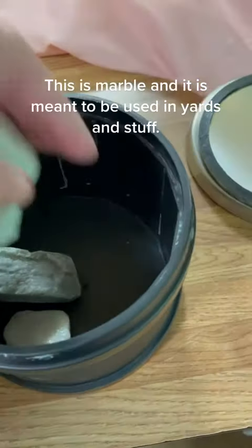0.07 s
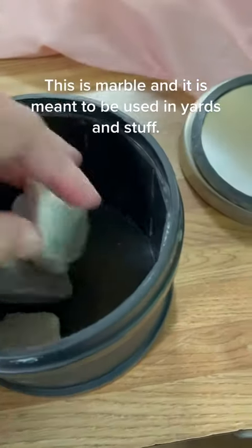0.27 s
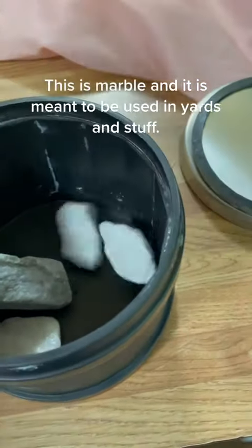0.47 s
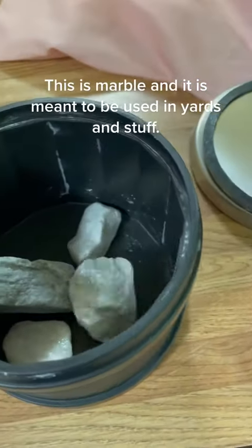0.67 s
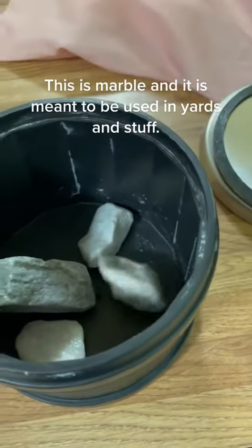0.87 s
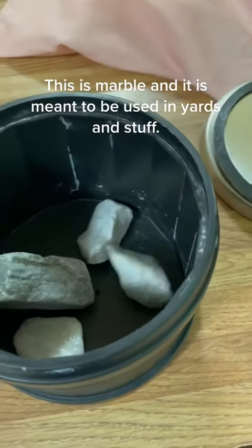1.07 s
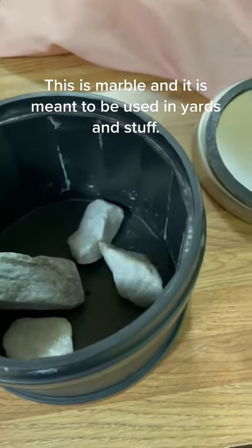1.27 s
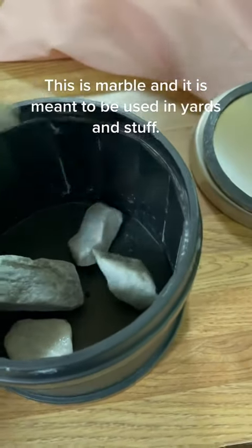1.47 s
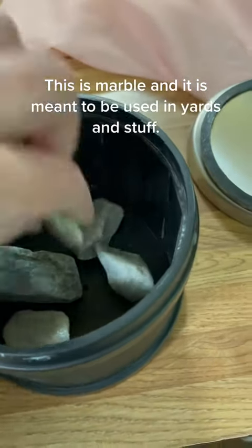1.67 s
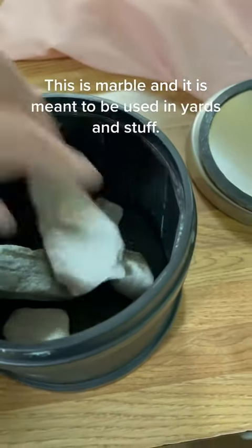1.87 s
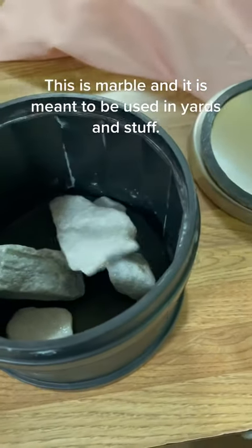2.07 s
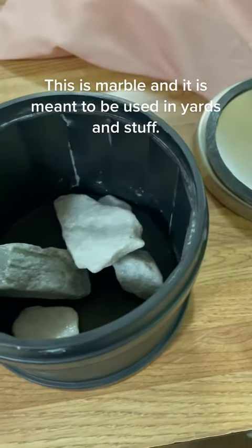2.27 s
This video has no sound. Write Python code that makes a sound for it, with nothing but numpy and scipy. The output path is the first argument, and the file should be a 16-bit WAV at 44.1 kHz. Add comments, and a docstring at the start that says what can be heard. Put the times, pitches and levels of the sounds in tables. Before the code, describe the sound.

Stones drop into a rubber barrel on a table. A sharp clack at 0.1 s leads to a bouncing cluster of clacks and hollow thuds at 0.3-0.45 s, with lighter knocks at 0.55, 0.6 and 0.75 s. Faint hand rustling follows around 1 s, a small tick at 1.4 s, a knock at 1.7 s, then loud bright clacks at 1.83 and 1.96 s, settling over quiet hum.

```python
"""In a quiet room with an appliance hum, stones are dropped into a rubber barrel on a wooden table.
Stone on stone clacks: a firm contact and a burst of grit excite resonators.
Stone on rubber thuds: a soft push excites the barrel's air and wall, and the table thumps.
Small stone clicks, a hand rustling among stones nearby and scuffing rubber are shaped noise.
Sparse echoes form the barrel and room; patchy noise and narrow noise bands form the air and hum."""
import sys
import numpy as np
from scipy import signal
from scipy.fft import rfft, irfft
from scipy.io import wavfile
from scipy.ndimage import uniform_filter1d

SR = 44100
rng = np.random.default_rng(int(sys.argv[2]) if len(sys.argv) > 2 else 0)


def wav_record(signal):
    """Record a signal, one row per channel, as 16-bit PCM in the file named by sys.argv[1]."""
    frames = np.transpose(np.atleast_2d(signal))
    bounded = np.clip(frames, -1, 1)
    # unit amplitude maps onto the largest positive 16-bit level
    quanta = np.round(bounded * 32767).astype(np.int16)
    wavfile.write(sys.argv[1], SR, quanta)


N = 101429

# Stone on stone: start_s, peak_db, low_ring_hz, low_ring_db, high_ring_hz, bright_modes_db, top_modes_db
STONE_CLACKS = [(0.118, -6.5, 2740, 9, 6470, -4, -22.5), (0.2174, -23, 2420, 2.5, 4760, -15, -49),
                (0.29, -13.5, 3030, 12.5, 6200, -5, -9), (0.293, -11, 3070, 14, 6220, -4, -10),
                (0.3255, -18.5, 1546, 24.5, 5370, -12, -25), (0.3374, -11, 2740, -5, 5410, -5, -25),
                (0.4104, -28.5, 1860, 18.5, 3900, -12, -41), (0.4535, -20, 1790, 5, 5470, -8.5, -46),
                (0.6207, -15.5, 2970, 13.5, 5040, -9.5, -22), (0.7469, -32, 1870, 1, 5430, -13, -9.5),
                (1.4174, -35.5, 1790, 14, 5260, -17, -43), (1.712, -17, 3050, 12.5, 4900, -22, -28),
                (1.8268, -3.5, 1690, 12.5, 7090, -7, -11.5), (1.8397, -19, 2040, 20, 7000, -26, -30),
                (1.86, -26, 1670, 23, 5340, -24, -20), (1.956, -5, 2100, -6, 4630, -0.5, -22),
                (1.957, -7.5, 2820, 6, 7100, 1, -14), (2.0209, -14, 2860, 4, 4800, -7, -46),
                (2.047, -28, 2200, 18, 5130, -36, -54), (2.071, -28.5, 2650, 8, 5160, -32, -49)]
# Stone on rubber: start_s, body_peak_db, air_pitch_hz, table_thump_db
RUBBER_THUDS = [(0.121, -23.5, 450, -25.5), (0.291, -27, 750, -21), (0.323, -17, 960, -23.5),
                (0.326, -7, 759, -22), (0.333, -17.5, 560, -33), (0.344, -21, 620, -18),
                (0.366, -23.5, 600, -32), (0.379, -24.5, 745, -25), (0.411, -14, 785, -64),
                (0.427, -20.5, 744, -30.5), (0.535, -19, 397, -27), (0.548, -26.5, 635, -23),
                (0.616, -24, 722, -48), (0.746, -36, 730, -51), (1.416, -28.5, 730, -30),
                (1.713, -20.5, 478, -26), (1.827, -21, 720, -20.5), (1.842, -14, 656, -56),
                (1.859, -33, 825, -29), (1.957, -11.5, 781, -33), (2.023, -26, 790, -48),
                (2.272, -30.5, 730, -51)]
# Modes of a stone, before each blow's shift and group level: nominal_hz, width_hz, relative_db
STONE_MODES = [(1200, 810, -8.5), (1714, 95, 6), (2244, 1000, 1), (2974, 1020, -1), (3877, 370, 5),
               (4570, 365, 7.5), (5250, 820, 12.5), (6060, 650, 9.5), (6930, 130, -3), (9360, 3000, 3.5),
               (11700, 4500, -27)]
# Modes of the barrel wall, before chance variation: nominal_hz, nominal_db, t60_s
BARREL_MODES = [(455, -22.5, 0.045), (1168, -13.5, 0.014), (1728, -17, 0.1)]
# Reverberation of the room: frequency_hz, t60_s
ROOM_DECAY = [(100, 0.26), (700, 0.48), (2000, 0.25), (5000, 0.23), (8000, 0.054)]
# Small clicks of the stones, then strokes of a hand rustling among them: start_s, length_s, level_db
CLICKS_AND_RUSTLES = [(.206, .008, -45), (.28, 0.013, -34.5), (.433, 0.0056, -43), (.855, 0.032, -55),
                      (.88, 0.018, -52.5), (.937, 0.057, -48.5), (.987, 0.024, -47), (1.0, 0.19, -44.5),
                      (1.051, 0.012, -38.5), (1.358, 0.027, -46.5), (2.24, 0.04, -50), (2.28, 0.12, -48.5)]
# Relative spectrum of the clicks and rustles: frequency_hz, density_db (per Hz)
RUSTLE_SPECTRUM = [(500, 3), (1500, -8.5), (3000, -11), (5200, -3.5), (6500, -3.5), (7800, -18.5),
                   (10500, -9), (13000, -24.5), (16000, -23)]
# Rubber scuffing that stirs the air in the barrel: start_s, length_s, level_db
SCUFF_STROKES = [(.33, 0.19, -51), (1.56, 0.3, -56), (1.76, 0.075, -49.5), (1.98, 0.16, -55.5)]
# Barrel resonances under scuffing: frequency_hz, width_hz, relative_db
SCUFF_RESONANCES = [(700, 400, 0), (1730, 70, -10)]
# Appliance hum as narrow noise bands: frequency_hz, width_hz, level_db
HUM_BANDS = [(118.05, 13.4, -47), (172.9, 21, -51), (355.7, 14.3, -55.5)]
# Likeness of left and right in the room air: frequency_hz, likeness (1 = identical)
CHANNEL_LIKENESS = [(60, 1), (300, 1), (1000, 0.44), (4000, 0.31), (12000, 0.22)]
# Relative spectrum of the room air: frequency_hz, density_db (per Hz)
AIR_SPECTRUM = [(30, -34), (55, 5), (120, -4), (250, -3), (450, -14), (750, -17.5), (1050, -30),
                (5500, -33.5), (7500, -48), (9500, -36), (13000, -46.5), (16500, -50)]

# Stone contact: time of the grit's peak, its level, and each mode's chance shift as a share
GRIND_S, GRIT_DB, STONE_SPREAD = 0.00125, -14.0, 0.015
BRIGHT_HZ, TOP_HZ = 4300, 8000  # lower edges of the bright and top mode groups
TONE_DB, TONE_WIDTH_HZ = 14, 222  # high ring over the bright modes; first-stage width of both rings
# Rubber contact: times to the peaks of push and air ring; starting level and decay of the knock
PUSH_S, AIR_SWELL_S, KNOCK_DB, KNOCK_T60_S = 0.00016, 0.0012, 1.5, 0.042
# Table thump: nominal pitch excess at the start, nominal end pitch, pitch time constant, decay
THUMP_EXCESS_HZ, THUMP_END_HZ, THUMP_FALL_S, THUMP_T60_S = 386.7, 74.7, 0.00744, 0.14
GRAINS_PER_S, GRAIN_SPREAD_DB = 400, 4.5
ROOM_DB, NEAR_DB, NEAR_T60_S, SIDE_DB = -16.5, -14.5, 0.028, -13
AIR_DB = -43
EDGE_HZ = 16500


def clack(s, peak_db, low_hz, low_db, high_hz, bright_db, top_db):
    """Impact excitation: a firm contact amid grit rings the stone modes and two rings of the pair."""
    t = np.arange(2048) / SR
    grit_swell = t / GRIND_S * np.exp(1 - t / GRIND_S)
    blow = gain_of(GRIT_DB) * rng.standard_normal(len(t)) * grit_swell
    blow[round(GRIND_S * SR / 2)] += 4  # the firm contact
    pair_rings = [(low_hz, low_db), (high_hz, TONE_DB + bright_db)]
    out = sum(gain_of(db) * resonate_twice(blow, hz, TONE_WIDTH_HZ) for hz, db in pair_rings)
    for k, (hz, width_hz, db) in enumerate(STONE_MODES):
        group_db = 0 if hz < BRIGHT_HZ else bright_db if hz < TOP_HZ else top_db
        # Each blow meets another stone, so its modes shift.
        shifted_hz = hz * (1 + STONE_SPREAD * rng.standard_normal())
        sign = (-1) ** k
        out = out + sign * gain_of(db + group_db) * resonate_twice(blow, shifted_hz, width_hz)
    return s, gain_of(peak_db) * out / abs(out).max()


def thud(s, peak_db, air_hz, table_db):
    """Compliant impact: a soft push rings barrel air and wall; the table thumps with sinking pitch."""
    t = np.arange(9000) / SR
    push = t[:300] / PUSH_S * np.exp(-t[:300] / PUSH_S)
    knock = gain_of(KNOCK_DB - 60 * t / KNOCK_T60_S) * rng.standard_normal(len(t))
    air_swell = t / AIR_SWELL_S * np.exp(1 - t / AIR_SWELL_S)
    air = air_swell * np.sin(2 * np.pi * air_hz * t)
    body = np.convolve(air + ring(BARREL_MODES, t) + knock, push)[:len(t)]
    body = resonate(body, 624, 1210)
    thump_hz = THUMP_END_HZ + THUMP_EXCESS_HZ * np.exp(-t / THUMP_FALL_S)
    thump_hz = thump_hz * rng.uniform(0.854, 1.212)
    onset = np.minimum(t / 0.012, 1)
    thump = np.sin(2 * np.pi * np.cumsum(thump_hz) / SR) * gain_of(-60 * t / THUMP_T60_S) * onset
    return s, gain_of(peak_db) * body / abs(body).max() + gain_of(table_db) * thump


def ring(modes, t):
    """Modal superposition: decaying sines, each with chance strength and a slight chance detuning."""
    luck = rng.standard_normal((len(modes), 2))
    out = 0
    for (hz, db, t60), (strength, detune) in zip(modes, luck):
        decay = gain_of(db + 2 * strength - 60 * t / t60)
        out = out + decay * np.sin(2 * np.pi * hz * (1 + detune / 50) * t)
    return out


def clicks_and_rustle():
    """Granular noise: dense tiny grains of uneven size over a soft hiss, gated into clicks and strokes."""
    size = gain_of(GRAIN_SPREAD_DB * np.minimum(rng.exponential(1, N), 5))
    strikes = size * (rng.random(N) < GRAINS_PER_S / SR)
    grains = evened(signal.lfilter([1], [1, -.99], strikes)) + 1  # the 1 is the hiss
    hz = np.fft.rfftfreq(N, 1 / SR)
    spectrum = rfft(grains * rng.standard_normal(N)) * gain_of(read(RUSTLE_SPECTRUM, hz))
    return level(CLICKS_AND_RUSTLES) * evened(irfft(spectrum, N))


def scuff():
    """Friction-driven resonance: lumpy noise excites the barrel resonances."""
    lumps = gain_of(2.5 * evened(uniform_filter1d(rng.standard_normal(N), 500)))
    friction = lumps * rng.standard_normal(N)
    rings = sum(gain_of(db) * evened(resonate(friction, hz, width_hz))
                for hz, width_hz, db in SCUFF_RESONANCES)
    return level(SCUFF_STROKES) * evened(rings)


def room(x):
    """Reverberation by sparse taps: quick barrel echoes, and a room tail dying band by band."""
    length = SR // 2
    taps = np.zeros((2, length))
    slots = np.arange(60, length - 20, 20)
    places = slots + rng.integers(0, 20, (2, len(slots)))
    np.put_along_axis(taps, places, rng.choice([-1., 1.], (2, len(slots))), 1)
    near = taps * gain_of(-60 * np.arange(length) / SR / NEAR_T60_S)
    hz, t, z = signal.stft(taps, SR, nperseg=256)
    decay = gain_of(-60 * t / read(ROOM_DECAY, hz)[:, None])
    far = signal.istft(z * decay, SR, nperseg=256)[1][:, :length]
    tail = gain_of(ROOM_DB) * far / np.linalg.norm(far[0])
    tail = tail + gain_of(NEAR_DB) * near / np.linalg.norm(near[0])
    # The second tap set enters with opposite signs left and right.
    tail = tail[0] + gain_of(SIDE_DB) * tail[1] * [[1], [-1]]
    return signal.fftconvolve(x[None], tail, axes=1)[:, :N]


def floor():
    """Partially coherent noise: patchy room air in two channels, with a wavering narrow-band hum."""
    frames, hz = N // 512 + 5, np.fft.rfftfreq(2048, 1 / SR)
    a, b, c, d, patches = rng.standard_normal((frames, 1025, 5)).T
    patches = evened(uniform_filter1d(uniform_filter1d(patches, 20, 0), 6, 1))
    same = np.clip(read(CHANNEL_LIKENESS, hz), -1, 1)[:, None]
    left = a + 1j * b
    right = same * left + np.sqrt(1 - same ** 2) * (c + 1j * d)
    z = np.array([left, right]) * gain_of(read(AIR_SPECTRUM, hz)[:, None] + 3.3 * patches)
    air = signal.istft(z, nperseg=2048, noverlap=1536)[1][:, :N]
    air = gain_of(AIR_DB) * evened(air)
    noise = rng.standard_normal(N)
    hum = sum(gain_of(db) * evened(resonate(resonate(noise, f, width_hz), f, width_hz))
              for f, width_hz, db in HUM_BANDS)
    return air + hum


def gain_of(db):
    """Logarithmic level: converts dB to an amplitude ratio."""
    return 10 ** (np.asarray(db) / 20)


def evened(x):
    """Power normalization: scales to rms 1."""
    return x / np.sqrt(np.mean(x ** 2) + 1e-20)


def read(points, hz):
    """Interpolation on a logarithmic frequency axis."""
    f, value = np.transpose(points)
    return np.interp(np.log(hz + 1), np.log(f + 1), value)


def level(events):
    """Amplitude envelope: the gain of each event swells quickly and fades."""
    out = np.zeros(N)
    for s, length, db in events:
        u = np.arange(0, 1, 1 / (length * SR))
        add(out, s, gain_of(db) * np.sin(np.pi * u ** 0.36))
    return out


def add(mix, s, sound):
    """Linear superposition: mixes a sound in at time s, in seconds."""
    part = mix[round(s * SR):][:len(sound)]
    part += sound[:len(part)]


def resonate(x, hz, width_hz):
    """Damped resonance: a two-pole band of peak gain 1."""
    return signal.lfilter(*signal.iirpeak(hz, hz / width_hz, SR), x)


def resonate_twice(x, hz, width_hz):
    """Cascaded resonance: a second stage, three times as wide, steepens the skirts."""
    return resonate(resonate(x, hz, width_hz), hz, 3 * width_hz)


def scene():
    """Superposition of impacts, clicks and friction, their reverberation, and the background."""
    near = clicks_and_rustle() + scuff()
    for row in STONE_CLACKS:
        add(near, *clack(*row))
    for row in RUBBER_THUDS:
        add(near, *thud(*row))
    return near + room(near) + floor()


def record(dry):
    """Band limitation: the microphone drops the deepest bass, the recorder the highest treble."""
    thin = signal.sosfilt(signal.butter(3, 45, "high", fs=SR, output="sos"), dry)
    lowpass = signal.firwin(511, EDGE_HZ, window=("kaiser", 9), fs=SR)
    return signal.oaconvolve(thin, lowpass[None], "same")


dry = scene()
out = record(dry)
wav_record(out)
```